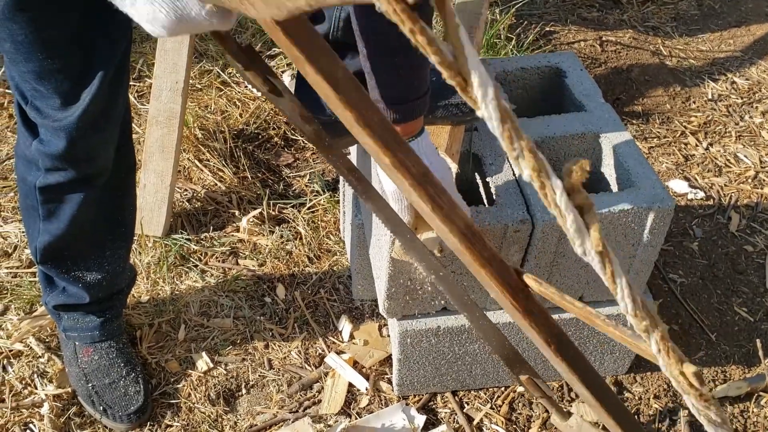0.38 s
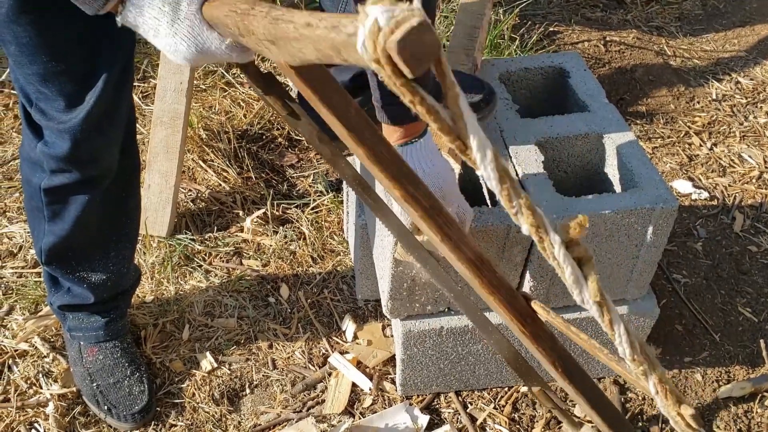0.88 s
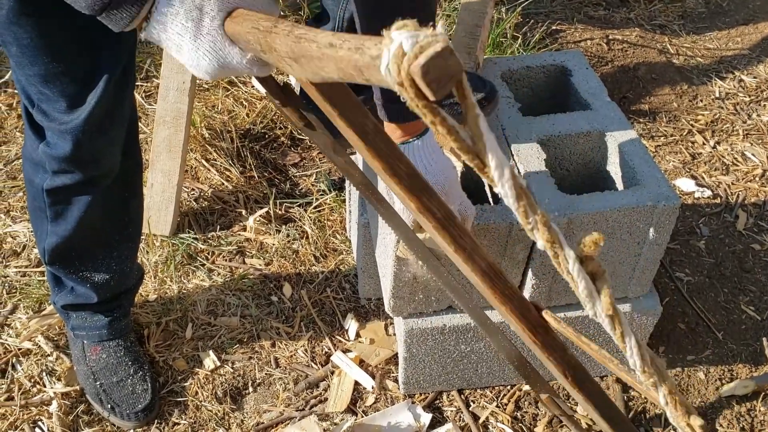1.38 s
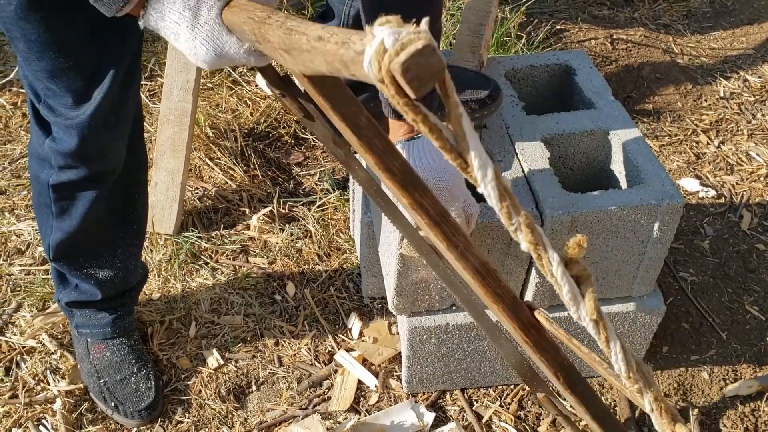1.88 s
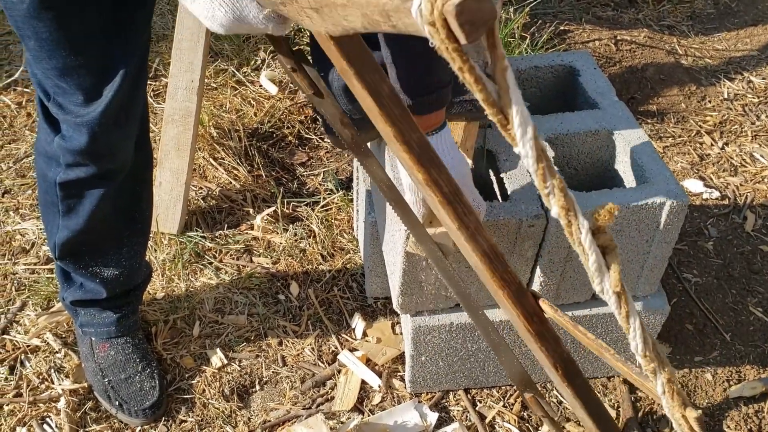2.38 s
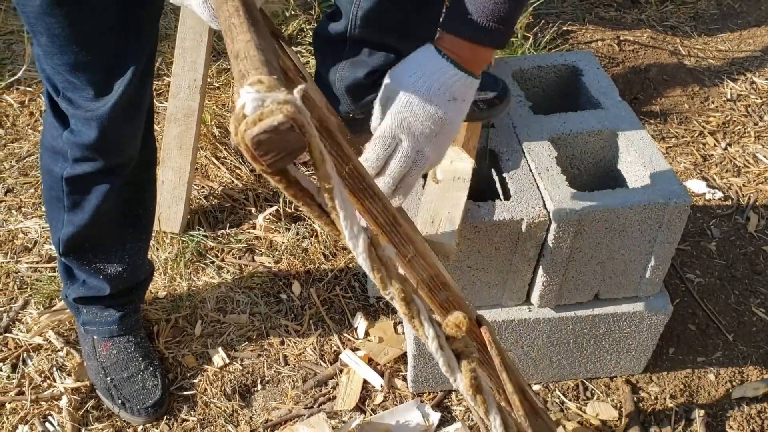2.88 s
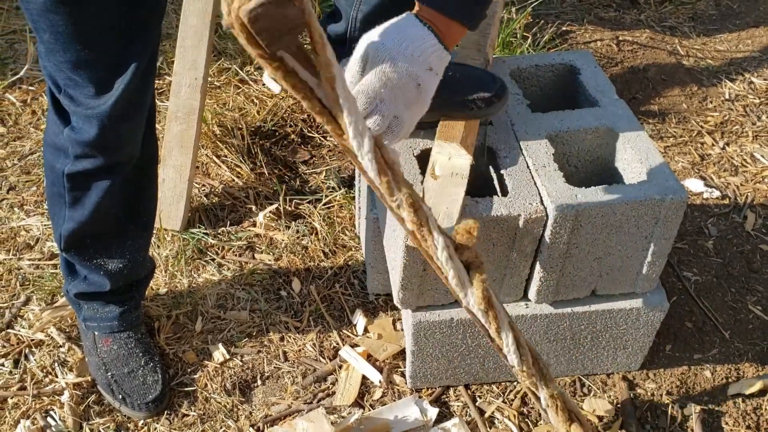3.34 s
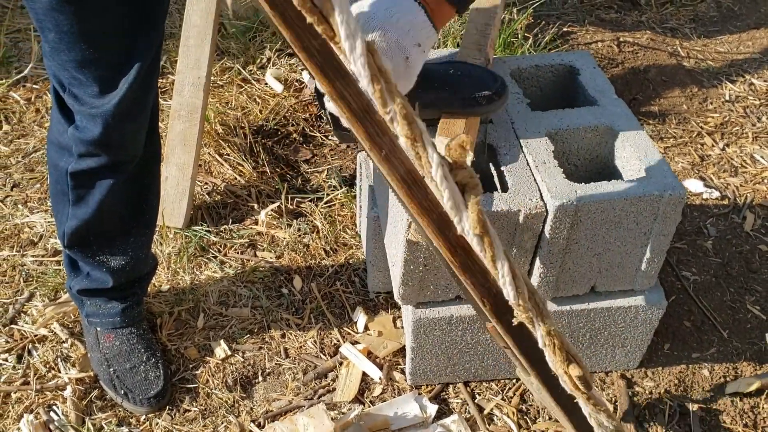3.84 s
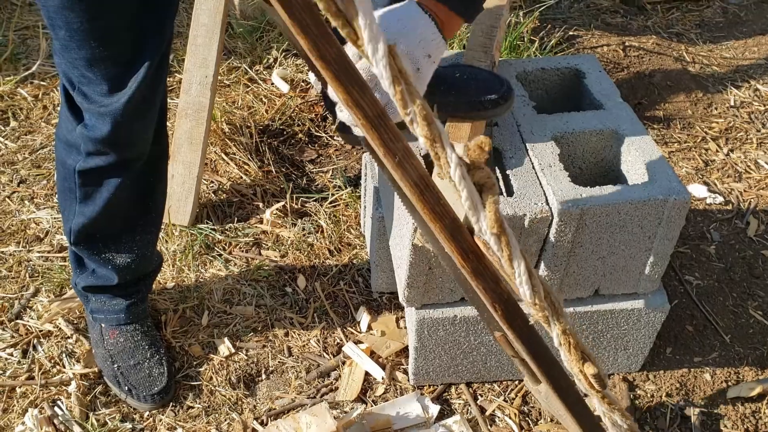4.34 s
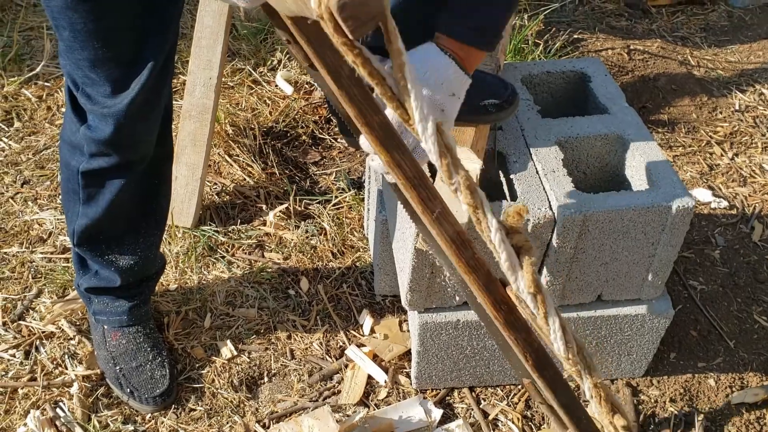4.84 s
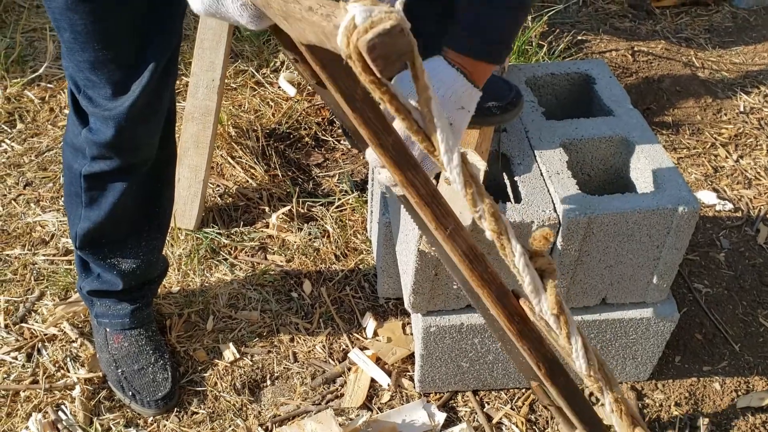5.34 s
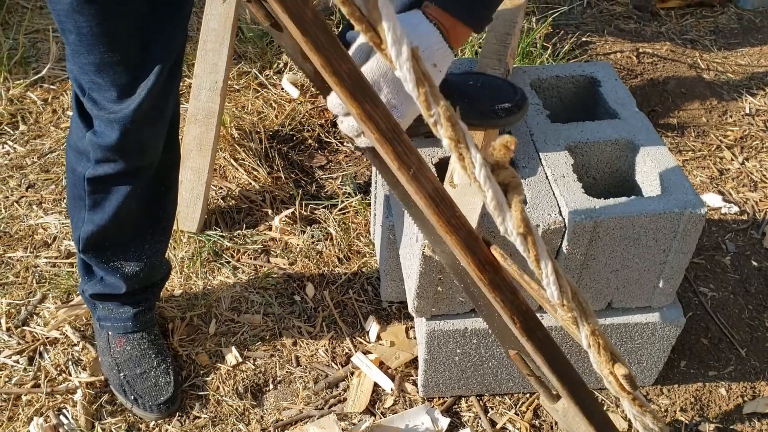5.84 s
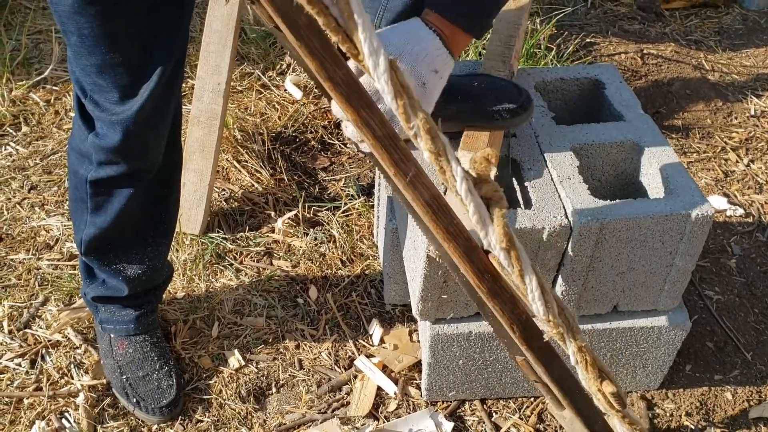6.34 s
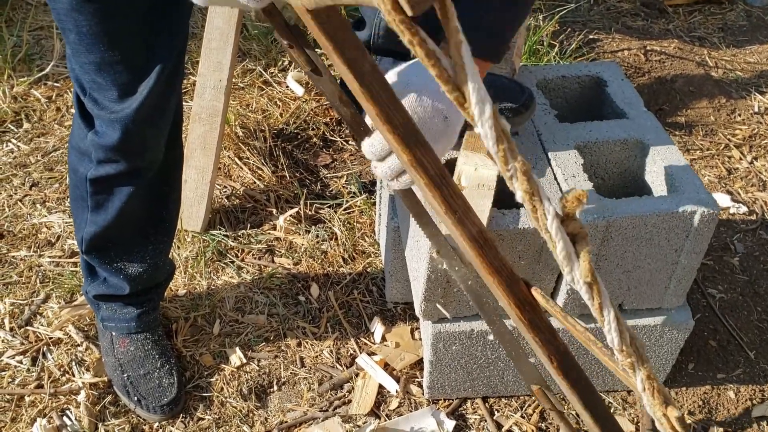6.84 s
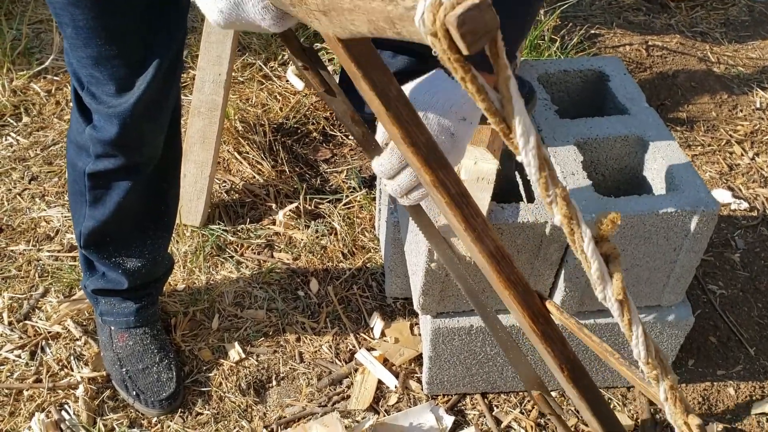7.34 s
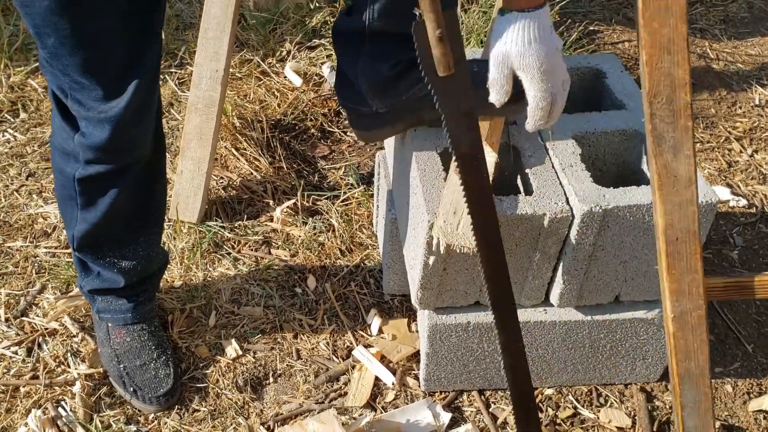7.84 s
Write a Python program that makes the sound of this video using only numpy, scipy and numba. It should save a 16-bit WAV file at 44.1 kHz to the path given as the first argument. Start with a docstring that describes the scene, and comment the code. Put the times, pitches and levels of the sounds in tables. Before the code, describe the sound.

From the start, a frame saw cuts a board close by, outdoors and dry: coarse, bright rasps, harsh pushes alternating with softer pulls, roughly one stroke every quarter second. Teeth catch with tiny cracks, the thin blade rings, the board gives a nasal woody squawk and the wooden frame rattles low. At about 2.3 s it stops; faint glove and cloth rustles follow, with a weak drag near 2.9 s. A soft restart at 3.4 s becomes steady sawing from 3.55 s, woodier at first, then brighter and grittier. Around 5.8-5.95 s the blade squeaks briefly while low gusts thump the microphone until about 6.3 s, with milder wind after. A stuttering, crackling rasp comes at 6.6-6.85 s. A distant dog barks at 7.05 s; the last stroke ends near 7.3 s. Quiet rubs and a small tick at 7.87 s follow over faint hiss, then another hoarse, echoing bark at 8 s.

```python
"""Outdoors, a frame saw is pushed and pulled through a board on concrete blocks, close to a phone.
Teeth tear fibres in uneven bites: noise shaped by their force rings the blade, the board and the frame.
The blade squeaks in one short flurry of narrow bands, and cloth rustles as grainy filtered noise.
Low noise makes gusts thump the microphone ports; far off a dog barks, in three partials with echoes."""
import sys
import numpy as np
from scipy import signal
from scipy.fft import rfft, irfft, next_fast_len
from scipy.io import wavfile
from scipy.ndimage import uniform_filter1d
from numba import njit

SR = 44100
rng = np.random.default_rng(int(sys.argv[2]) if len(sys.argv) > 2 else 0)


def volts_from_db(level):
    """Convert decibel levels to linear amplitude ratios."""
    exponent = np.asarray(level, float) / 20
    return 10 ** exponent


def log_audio(samples):
    """Write samples as a 16-bit WAV file to the path given in sys.argv[1]."""
    # one column per channel
    frames = np.atleast_2d(samples).T
    # limit to full scale, then quantise
    limited = np.clip(frames, -1, 1)
    pcm = np.round(limited * 32767).astype(np.int16)
    wavfile.write(sys.argv[1], SR, pcm)


N = 362061
T = np.arange(N) / SR
COARSE = T[::32]  # clock for slow levels, s
SIZE = next_fast_len(N + 8192)
HZ = np.arange(SIZE // 2 + 1) * SR / SIZE + 1e-3

# Gloves and blade brushing the wood in the pauses:
# (start of hold [s], hold [s], level [dB], swell over the hold [dB], board over blade [dB])
TOUCHES = [(2.391, 0.029, -62, -12, -13), (2.47, .065, -61.5, 11, -26), (2.57, 0.082, -69, -11.5, -21),
           (2.72, .09, -69.5, 3, -25), (3.117, 0.022, -61, -8, -3), (7.365, 0.063, -60, 6.5, -14),
           (7.466, 0.13, -62.5, 4, -7), (7.64, .12, -65.5, -4.5, -6.5), (7.872, 0.014, -49, -5, -11),
           (7.9, 0.029, -66, -4, -12)]
TOUCH_SLOPES = (1360, 305)  # rise and fall, dB per s
EVEN_DB = -31  # blade level at which frame, hiss, board pitch and stir of air are neutral


def unit(x):
    """Scale to rms 1."""
    return x / np.sqrt(np.mean(x ** 2))


def curve(rows):
    """Columns of a time table, one value a sample."""
    s, *columns = np.transpose(rows)
    return [np.interp(T, s, c) for c in columns]


def spectrum(points):
    """Values of a frequency table, joined on a log axis."""
    hz, value = np.transpose(points)
    return np.interp(np.log(HZ), np.log(hz), value)


def modes(rows):
    """Response of damped resonances with alternating sign."""
    response = 0
    for k, (hz, width, db) in enumerate(rows):
        response = response + (-1) ** k * volts_from_db(db) / (1 + 1j * (HZ - hz ** 2 / HZ) / width)
    return response


def colour(x, response):
    """Filter by a response scaled to keep the power of white noise."""
    even = response / np.sqrt(np.mean(np.abs(response) ** 2))
    return irfft(rfft(x, SIZE) * even, SIZE)[..., :N]


@njit
def svf(x, hz, width):
    """Band-pass whose centre moves, gain 1 at the centre."""
    y, b, l = np.empty(len(x)), 0., 0.
    for i in range(len(x)):
        g, k = np.tan(np.pi * hz[i] / SR), width / hz[i]
        v = (b + g * (x[i] - l)) / (1 + g * (g + k))
        b, l, y[i] = 2 * v - b, l + 2 * g * v, k * v
    return y


def walk(rate):
    """Random levels that slew from one to the next every 1 / rate s; rms 1."""
    k = int(SR / rate)
    steps = np.repeat(rng.standard_normal(N // k + 1), k)
    return unit(uniform_filter1d(steps, k)[:N])


def fade(x, decay_s):
    """Every kick dies away exponentially."""
    return signal.lfilter([1], [1, -np.exp(-1 / (decay_s * SR))], x)


def kicks(times_s, level_db):
    """One spike for each event."""
    out = np.zeros(N)
    np.add.at(out, (np.array(times_s) * SR).astype(int), volts_from_db(level_db))
    return out


def burst(times_s, level_db, rise_s, decay_s):
    """Force after each catch: a quick rise, then a short fade."""
    spikes = kicks(times_s, level_db)
    return fade(spikes, decay_s) - fade(spikes, rise_s)


def holds(rows, slopes):
    """Level in dB of each event on the coarse clock: it rises, holds with a swell and falls away."""
    start, hold, db, swell_db = np.transpose(rows)[:4, :, None]
    s = COARSE - start
    swell = swell_db * (np.clip(s / hold, 0, 1) - .5)
    return db + swell + slopes[0] * np.minimum(s, 0) - slopes[1] * np.maximum(s - hold, 0)


def total(db):
    """Power sum of overlapping events in dB, one value a sample."""
    power = np.sum(10 ** (db / 10), axis=0)
    return np.interp(T, COARSE, 10 * np.log10(power + 1e-12))


def teeth(rate, scatter_db, decay_s):
    """Force of teeth tearing at random moments, some harder than the rest."""
    strength = volts_from_db(scatter_db * np.clip(rng.standard_normal(N), -2, 2))
    tears = (rng.random(N) < rate / SR) * strength
    return unit(np.sqrt(fade(tears ** 2, decay_s) + 1e-9))


def ring(force, rows, wander_db):
    """Resonances driven together, each swelling and sinking at random on its own."""
    shapes = [modes([row]) * (-1) ** k for k, row in enumerate(rows)]
    ringing = sum(rfft(force * volts_from_db(wander_db * walk(14)), SIZE) * shape for shape in shapes)
    return irfft(ringing / np.sqrt(np.mean(np.abs(sum(shapes)) ** 2)), SIZE)[..., :N]


def strokes():
    """Force of pushes, pulls and touches on blade, board and frame, in dB."""
    # Strokes: (start of hold [s], hold [s], blade level [dB], swell over the hold [dB],
    # board over blade [dB])
    push_rows = [(0.284, 0.13, -31, 13.5, -4.2), (0.762, 0.012, -39.5, 3.5, -1.5),
                 (0.821, 0.089, -26.5, -3.5, -6.5), (1.232, 0.023, -43, 4.5, 1.5),
                 (1.275, 0.079, -26.5, 2.9, -4.5), (1.717, 0.1, -31.5, 9.5, -8.5),
                 (2.227, 0.057, -36.5, 2.5, -9), (3.497, 0.041, -56.5, 3.5, 3), (3.551, 0.049, -36, 12, 2),
                 (3.892, 0.046, -55, 15, 4), (3.953, 0.067, -36.5, -3.1, 0.5),
                 (4.331, 0.095, -35.5, 8.5, 0.8), (4.747, 0.099, -36, 7.5, 1.7), (5.167, 0.075, -31, 1, 2),
                 (5.574, 0.084, -29.5, -1, -5), (5.963, 0.091, -28.5, 1, -14.1),
                 (6.332, 0.1, -35.5, 22.5, -18.5), (6.776, 0.08, -29.5, 7.7, -17.5),
                 (7.186, 0.068, -37.5, -4, -18)]
    pull_rows = [(0.083, 0.12, -32.5, 5, -9), (0.563, 0.12, -36, -0.5, -5.5), (1.043, 0.135, -35, -6, -8.5),
                 (1.536, 0.095, -33, -4, -10.5), (2.004, 0.11, -42.5, -7, -10),
                 (2.872, 0.18, -52.5, -5, -3), (3.391, 0.038, -53.5, -0.5, 3.5),
                 (3.734, 0.079, -48.5, -3, -1.2), (4.131, 0.1, -45, -1.5, -1),
                 (4.554, 0.11, -40.5, -1, -5.5), (4.951, 0.11, -41.5, 0.5, 0.5),
                 (5.361, 0.1, -42, -2, -0.3), (5.761, 0.11, -40.5, 1.5, -12),
                 (6.188, 0.087, -43, -2.5, -10), (6.617, 0.049, -37.5, -7, -13),
                 (7.032, 0.07, -42.5, -10.5, -13)]  # same columns
    push_slopes, pull_slopes = (356, 376), (289, 495)  # rise and fall, dB per s
    board_lead_s, push_tilt_db, pull_tilt_db = 0.0027, 2, 1  # the board speaks early in a stroke
    catch_s, catch_lead_s, catch_db = 0.011, 0.0052, 2
    frame_follows = 0.95  # the frame gains less than the blade from force
    pull_frame_db = 1.5  # pulls rattle the frame more

    blade = np.concatenate([holds(push_rows, push_slopes), holds(pull_rows, pull_slopes),
                            holds(TOUCHES, TOUCH_SLOPES) - 3])

    def early(rows, tilt_db):
        """Board events: ahead of the blade, with a tilt over the hold."""
        return [(s - board_lead_s, hold, db + over, swell + tilt_db) for s, hold, db, swell, over in rows]

    # the board squawks as the teeth of a push first catch
    catches = [(s - catch_lead_s, catch_s, db - swell / 2 + over + catch_db, 0)
               for s, _, db, swell, over in push_rows]
    board = np.concatenate([holds(early(push_rows, push_tilt_db), push_slopes),
                            holds(early(pull_rows, pull_tilt_db), pull_slopes),
                            holds(early(TOUCHES, 0), TOUCH_SLOPES),
                            holds(catches, TOUCH_SLOPES)])
    pulled = np.repeat([0, 1, 0], [len(push_rows), len(pull_rows), len(TOUCHES)])[:, None]
    frame = EVEN_DB + frame_follows * (blade - EVEN_DB) + pull_frame_db * pulled
    return total(blade), total(board), total(frame)


def yard():
    """Faint outdoor hiss: coloured noise whose level wanders slowly."""
    # Colour of the hiss: (frequency [Hz], relative density [dB])
    yard_colour = [(35, -34), (60, -2.5), (1020, -16), (1120, -17.5), (2840, -21), (3120, -21.5),
                   (6560, -14), (7720, -25.5), (15500, -16)]
    level = volts_from_db(-69 + 1.5 * walk(4))
    return level * colour(rng.standard_normal((2, N)), volts_from_db(spectrum(yard_colour)))


def wind():
    """Low thumps of air, unrelated at the two ports, over a stir of air that rises with the strokes."""
    # Gusts on the ports: (start of hold [s], hold [s], level before port offset [dB], swell [dB])
    gust_rows = [(1.6, .04, -59.5, 0), (3.55, .11, -63.5, 1), (3.92, .05, -59.5, 1), (4.36, 0.025, -63, -7),
                 (4.76, 0.045, -59, -11), (5.4, .04, -63, 7), (5.57, 0.034, -61, 5),
                 (5.815, 0.046, -42, -2), (5.91, 0.16, -41.5, -10), (6.13, 0.046, -39, 1),
                 (6.23, 0.22, -54, -4), (6.68, .28, -50.5, -2), (7.04, 0.22, -59.5, 0.5),
                 (7.55, 0.026, -66, -1.5), (7.84, 0.015, -68, -4.5), (7.92, 0.19, -66.5, -8.5)]
    stir_db, stir_follows = -69, 0.36
    stir = stir_db + stir_follows * (strokes()[0] - EVEN_DB) + 1.3 * walk(8.8)
    db = total(np.vstack([holds(gust_rows, (1500, 240)), stir[::32]]))
    flutter = volts_from_db(4 * np.array([walk(22), walk(22)]))
    port_db = np.array([[4.5], [-2.5]])  # left, right
    air = volts_from_db(db + port_db) * flutter * rng.standard_normal((2, N))
    low = [(15, -37), (35, -12), (58, -3.5), (90, -5), (160, -19), (400, -42.5), (2000, -84.5)]
    return colour(air, volts_from_db(spectrum(low)))  # (Hz, dB)


def steel_blade(blade_db, low_db, chatter, crack):
    """Tearing teeth and cracks ring the high and low modes of the blade."""
    # Blade modes: (frequency [Hz], width [Hz], relative level [dB])
    low_modes = [(1710, 51, -6), (1851, 52, 1), (2037, 25, 4.5), (2370, 68, -2.5), (2630, 66, -3.5),
                 (2850, 47, 0.5), (2983, 39, -0.5), (3264, 130, -2.5)]
    high_modes = [(3480, 110, -7), (3830, 190, 0), (4162, 38, 0), (4503, 40, 1.5), (4750, 410, -6),
                  (5630, 90, -7.5), (6150, 99, -1.5), (6557, 273, 0.5)]  # same columns
    force = volts_from_db(blade_db) * chatter * teeth(1100, 3, 0.0016) + crack
    high = ring(force * rng.standard_normal((2, N)), high_modes, 2.82)
    low = ring(force * volts_from_db(low_db) * rng.standard_normal((2, N)), low_modes, 2.8)
    return volts_from_db(-2.5) * high + volts_from_db(-10) * low


def torn_fibres(blade_db, hiss_db, chatter, crack):
    """Hiss of tearing fibres, which gains more than the blade from force."""
    # Colour of the fibre hiss: (frequency [Hz], relative density [dB])
    fibre_colour = [(1500, -21), (2500, -12.5), (5000, -2), (7000, -3.5), (8000, -7.5), (10000, -3),
                    (12000, 0), (13500, -2.5), (15500, -4.5)]
    hiss_follows = 1.063
    pressed = volts_from_db(EVEN_DB + hiss_follows * (blade_db - EVEN_DB) - 1.5)
    force = pressed * chatter * teeth(1100, 3.6, 0.0026) + volts_from_db(8) * crack
    noise = rng.standard_normal((2, N))
    return volts_from_db(-0.5) * colour(force * volts_from_db(hiss_db) * noise, volts_from_db(spectrum(fibre_colour)))


def sawn_board(board_db, board_hz, push, bite_s, knock_db):
    """The board's moving resonance answers the slower push of the teeth; each catch strikes a blow."""
    tearing = burst(bite_s, knock_db + 1.5, 0.0041, 0.0068)
    wood = (volts_from_db(board_db + 1) * push + tearing) * rng.standard_normal((2, N))
    rubbed = np.array([svf(svf(w, board_hz, 1000.), board_hz, 400.) for w in wood])
    blows = kicks(bite_s, knock_db + 24)
    return volts_from_db(16.5) * rubbed + svf(svf(blows, board_hz, 500.), board_hz, 120.)


def wooden_frame(shake_db, bar_db, push, bite_s, crack_db):
    """Strokes shake the frame and its stretcher bar, catches thud on the frame and its joints knock."""
    # Frame modes: (frequency [Hz], width [Hz], relative level [dB])
    frame_modes = [(149.8, 39, -8.5), (203, 70, -8.5), (294.6, 53.6, -2), (535, 55.5, -0.5), (692, 37, 0),
                   (987.6, 70, -2.5)]
    bar_modes = [(1095, 92.5, -3.5), (1106, 69.4, -0.5)]  # same columns
    # Knocks of the joints: (time [s], relative level [dB])
    joint_s, joint_db = np.transpose([(0.361, -27), (0.806, -29.5), (.858, -28), (1.28, -27.5),
                                      (1.821, -29), (2.26, -39), (2.886, -39.5), (2.926, -38),
                                      (4.176, -34.5), (4.595, -31), (4.762, -34.5), (5.965, -27.5),
                                      (6.022, -33), (6.047, -24), (6.359, -30), (6.365, -29),
                                      (6.545, -38.5), (6.792, -32), (7.2, -38)])
    thud_db = -24.5  # blow on the frame, over the crack
    shake = volts_from_db(shake_db - 2.5 + 1.3 * walk(40))
    shaken = ring(shake * rng.standard_normal((2, N)), frame_modes, 2.6)
    # a soft blow favours the low modes
    thuds = burst(bite_s, crack_db + thud_db, .0002, 0.00038)
    knocks = volts_from_db(5) * fade(kicks(joint_s, joint_db), 0.00015)
    struck = colour(thuds + knocks, modes(frame_modes))
    bar = colour(shake * volts_from_db(bar_db) * push * rng.standard_normal((2, N)), modes(bar_modes))
    return shaken + struck + bar


def saw():
    """Blade, fibres, board and frame share the stroke forces; noise differs in the two rows, blows do not."""
    # Teeth that catch and break free: (time [s], crack level [dB], board over crack [dB])
    bite_s, crack_db, knock_db = np.transpose([(0.204, -23.5, -30), (0.273, -17.5, -2),
                                               (0.3152, -12.5, -3.5), (0.3547, -13.5, -1.5),
                                               (0.3583, -11.5, -6.5), (0.3699, -16, -7),
                                               (0.4055, -24.5, -7), (0.5392, -27.5, -1), (0.7548, -22, -8),
                                               (0.7712, -20, -4), (0.8094, -15.5, -2), (0.821, -8, -22),
                                               (0.8594, -10.5, -5.5), (1.254, -27.5, -2),
                                               (1.261, -28.5, -13), (1.2738, -21.5, -20),
                                               (1.5067, -26.5, -8), (1.5696, -10, -20), (1.707, -29.5, 5),
                                               (1.7545, -17.5, 2), (1.8185, -24, -28), (1.929, -38, -20),
                                               (2.2233, -29.5, -16), (2.2509, -15.5, -8), (2.391, -42, -27),
                                               (2.5202, -35, -36), (2.8425, -35.5, -23), (2.884, -38, -11),
                                               (2.895, -35, -16), (2.9243, -38, -18), (3.1146, -43, -20),
                                               (3.4916, -34, -9), (3.5485, -21.5, 5.5), (3.5584, -24.5, -5),
                                               (3.5912, -14, 1), (3.9138, -33, 6), (3.938, -27, -4),
                                               (3.9672, -18, -7), (3.9816, -35, -12), (4.0016, -25, -9),
                                               (4.125, -29, -13), (4.3055, -34, 9), (4.326, -26, -17),
                                               (4.4033, -24.5, 4), (4.5955, -24.5, -14),
                                               (4.7607, -16.5, -4), (4.8104, -15, -5), (4.8248, -7, -11),
                                               (5.069, -15.5, -2.5), (5.1453, -18.5, 0), (5.1617, -17.5, 1),
                                               (5.1876, -25, -17), (5.5308, -30.5, 5), (5.5433, -18.5, -8),
                                               (5.5543, -13, -7), (5.6077, -16.5, -12), (5.9643, -12, -22),
                                               (6.0196, -7.5, -22), (6.045, -16, -8), (6.326, -17.5, -20),
                                               (6.3517, -34, -28), (6.358, -39.5, -14), (6.3896, -13, -11),
                                               (6.4216, -18, -24), (6.4408, -8, -19), (6.5435, -25.5, -15),
                                               (6.5905, -16, -30), (6.608, -16.5, -33),
                                               (6.6184, -16.5, -35), (6.636, -18, -35), (6.6476, -23, -27),
                                               (6.664, -19, -32), (6.6793, -17, -29), (6.6958, -16.5, -34),
                                               (6.7197, -28, -15), (6.7409, -11, -20), (6.762, -12, -28),
                                               (6.775, -10.5, -24), (6.793, -9, -35), (6.8093, -4, -31),
                                               (6.8234, -10, -31), (6.8394, -13.5, -25),
                                               (6.9961, -25.5, -27), (7.0405, -29, -18),
                                               (7.0608, -17.5, -16), (7.1006, -18, -29), (7.149, -20, -16),
                                               (7.1661, -21, -33), (7.186, -15, -37), (7.2, -9.5, -41),
                                               (7.371, -52, -33), (7.4143, -44.5, -17), (7.4205, -48, -7),
                                               (7.664, -42, -20), (7.7648, -57, -18), (7.8745, -33, -14),
                                               (7.9967, -44, -17.5)])
    # As the cut deepens: (time [s], board resonance before stiffening [Hz], fibre hiss [dB],
    # low blade modes [dB], frame [dB], stretcher bar over frame [dB])
    board_hz, hiss_db, low_db, frame_db, bar_db = curve([(0, 1510, .5, -3.5, -6, -3.5),
                                                         (.8, 1446, .5, 1, -5, -2),
                                                         (1.5, 1390, -0.5, -4, -6.5, -6),
                                                         (1.8, 1490, 1, -3.5, -5.5, -3),
                                                         (2.2, 1540, 1, -1.5, -4.5, -3),
                                                         (2.6, 1520, -1.5, -13, -20, -5),
                                                         (2.9, 1610, 7.5, 2.5, 2, 3),
                                                         (3.3, 1450, 7.5, 2.5, -4.5, 6.5),
                                                         (3.6, 1390, 3.5, 8, -1, 2),
                                                         (4.5, 1470, 2.5, 3.5, -0.5, 3),
                                                         (5.5, 1435, 3, 3, -1, 1),
                                                         (6.1, 1410, 0.1, 8, -10, -4.5),
                                                         (6.6, 1520, 3.5, 1.7, -12, 1.5),
                                                         (7.2, 1600, 1.5, 4, -9.5, -7.5),
                                                         (7.45, 1560, -2, -1, -15, 3),
                                                         (7.75, 1400, 0, 2, 3, -21),
                                                         (7.9, 1400, -3.5, 1, -10.5, 0)])
    stiffen_per_db = 0.0063  # the board's resonance climbs as the blade presses harder
    stall_s, stall_db = 0.0028, -1.5  # the blade stalls just before a caught tooth breaks free

    blade_db, board_db, shake_db = strokes()
    board_hz = board_hz * (1 + stiffen_per_db * np.clip(blade_db - EVEN_DB, -30, 10))
    # the blade judders in the kerf
    stall = fade(kicks(bite_s, 0 * crack_db)[::-1], stall_s)[::-1]
    chatter = volts_from_db(1.8 * walk(80)) * volts_from_db(stall_db * np.minimum(stall, 1))
    crack = burst(bite_s, crack_db - 16.5, .0005, 0.0041)
    push = chatter * teeth(560, 2.4, 0.0056)  # slower force felt by the wood

    steel = steel_blade(blade_db, low_db, chatter, crack)
    fibres = torn_fibres(blade_db, hiss_db, chatter, crack)
    board = sawn_board(board_db, board_hz, push, bite_s, crack_db + knock_db)
    frame = wooden_frame(shake_db + frame_db, bar_db, push, bite_s, crack_db)
    return steel + fibres + board + frame


def rustle():
    """Soft, grainy rubbing of cloth on wood."""
    rub = volts_from_db(total(holds(TOUCHES, TOUCH_SLOPES)) - 3) * teeth(2500, 4, .001)
    cloth = [(2400, -30), (3800, 4.5), (6500, -6), (8000, -7.5), (15500, -11.5)]  # (Hz, dB)
    return colour(rub * rng.standard_normal((2, N)), volts_from_db(spectrum(cloth)))


def squeak():
    """Stick-slip bursts ring narrow bands of the pinched blade."""
    # Blade binding in the kerf: (start of hold [s], hold [s], relative level [dB], swell [dB], pitch [Hz])
    squeak_rows = [(5.767, 0.08, -38.5, -7, 2530), (5.792, .06, -46, 8.5, 2850),
                   (5.861, 0.031, -44.5, 0.5, 2290), (5.914, .012, -46.5, -3, 2270)]
    flicker_db = 3.8 * walk(200)
    noise = rng.standard_normal((2, N))
    out = np.zeros((2, N))
    for row in squeak_rows:
        slips = volts_from_db(total(holds([row], (1600, 1200))) + flicker_db) * noise
        hz = np.full(N, float(row[-1]))
        # two band-passes in a row, 310 and 143 Hz wide
        out += np.array([svf(svf(w, hz, 310.), hz, 143.) for w in slips])
    return volts_from_db(25) * out


def dog():
    """Hoarse barks, three partials on a shaky pitch, smeared by echoes that differ at each port."""
    # Bark syllables: (start of hold [s], hold [s], level [dB], swell [dB], mean pitch [Hz])
    bark_rows = [(7.032, 0.035, -47.5, 6, 562.3), (7.108, 0.046, -54.5, 8, 582), (7.96, 0.025, -64, 4, 569),
                 (8.005, .045, -44.5, 5.5, 558), (8.066, 0.023, -52, -8.5, 503.6),
                 (8.104, 0.016, -58.5, -5.5, 582), (8.144, 0.055, -71, -2.5, 586)]
    db = total(holds(bark_rows, (910, 790)))
    hz, = curve([(s + hold / 2, pitch) for s, hold, _, _, pitch in bark_rows])
    phase = 2 * np.pi * np.cumsum(hz * (1 + 0.046 * walk(160))) / SR
    voice = np.sin(phase) + volts_from_db(-2.5) * np.sin(2 * phase) + volts_from_db(-26) * np.sin(3 * phase)
    voice = voice * volts_from_db(db + 3.5 * walk(110))
    tail = np.arange(SR // 4) / SR
    echoes = rng.standard_normal((2, len(tail))) * np.exp(-tail / 0.026)
    return voice + volts_from_db(-24.5) * signal.fftconvolve(voice[None], echoes, axes=1)[:, :N]


def ports(pair):
    """Common and differing parts become left and right; the phone body shades and delays them unevenly."""
    # Likeness of the ports: (frequency [Hz], share common to both [0..1])
    like = np.clip(spectrum([(60, 0.46), (130, 0.97), (290, 0.91), (640, 0.76), (1400, 0.66), (2400, 0.11),
                             (4000, 0.33), (8000, 0.087), (15000, 0.083)]), 0, 1)
    # Left over right: (frequency [Hz], level [dB])
    left_db = spectrum([(60, -5), (110, -3.5), (200, 1), (380, 1), (700, 0.5), (1290, 5.5), (2380, 3.5),
                        (4400, 5.5), (8120, -0.5), (15000, -6.5)])
    # Left ahead of right: (frequency [Hz], phase [rad])
    left_lead = spectrum([(100, 0), (1100, 0.25), (1400, 0.53), (2400, -0.6), (2850, 0.5), (4000, -1.7),
                          (5300, 0), (6800, -2), (16000, -4)])
    mid, side = rfft(pair, SIZE) * np.sqrt([(1 + like) / 2, (1 - like) / 2])
    tilt = volts_from_db(left_db / 2) * np.exp(.5j * left_lead)  # half on each port
    return irfft([(mid + side) * tilt, (mid - side) / tilt], SIZE)[:, :N]


def scene():
    """Saw, squeak, cloth and yard through the two ports, with wind and dog."""
    return ports(yard() + saw() + rustle() + squeak()) + wind() + dog()


def roll_off(x):
    """The treble ends steeply here."""
    return signal.sosfilt(signal.butter(12, 16990, fs=SR, output="sos"), x)


def record(dry):
    """The phone cuts the top above 16 kHz with a steep low-pass."""
    top = signal.ellip(10, .2, 70, 16000, fs=SR, output="sos")  # ripple and stop-band in dB
    mix = signal.sosfilt(top, dry)
    return roll_off(mix)


dry = scene()
out = record(dry)
log_audio(out)
```